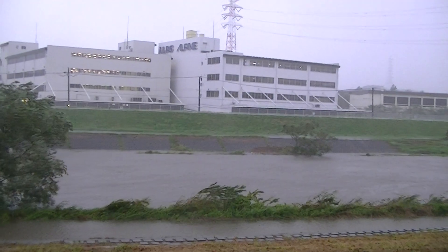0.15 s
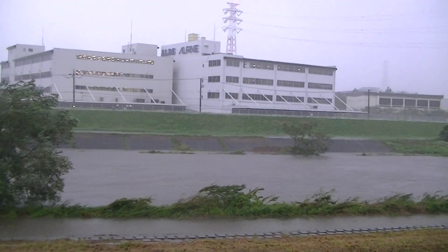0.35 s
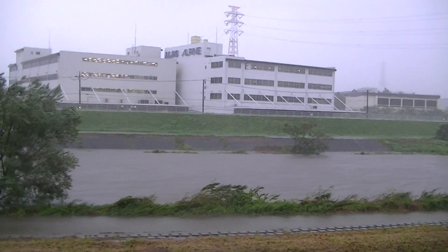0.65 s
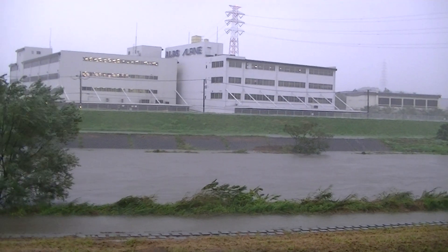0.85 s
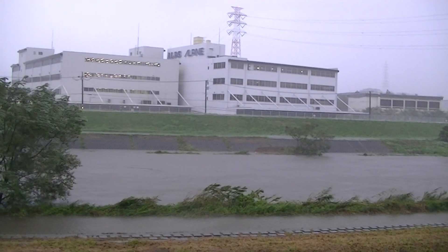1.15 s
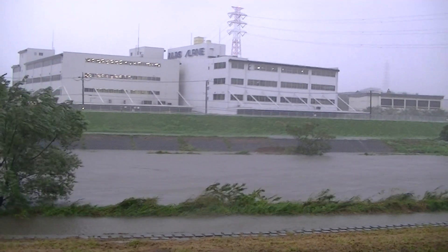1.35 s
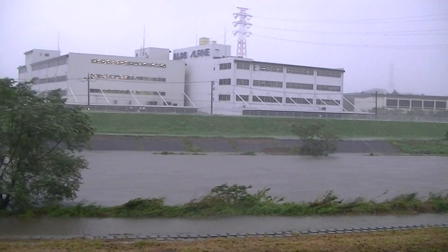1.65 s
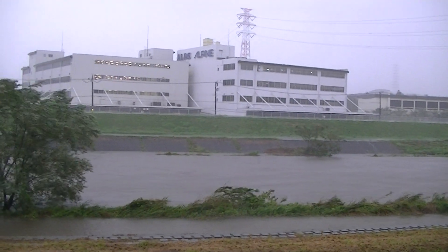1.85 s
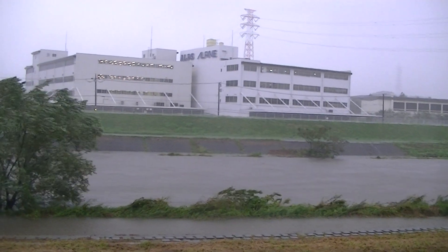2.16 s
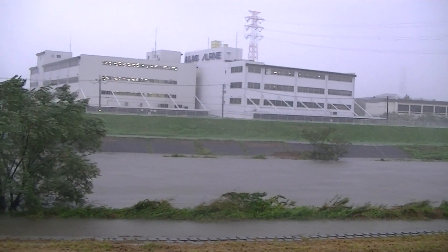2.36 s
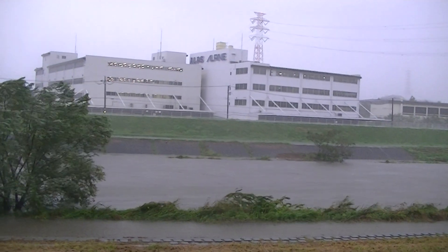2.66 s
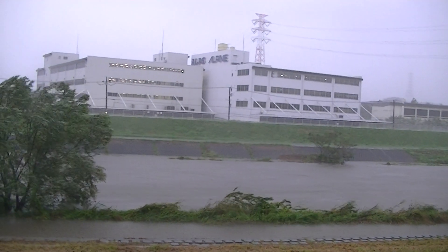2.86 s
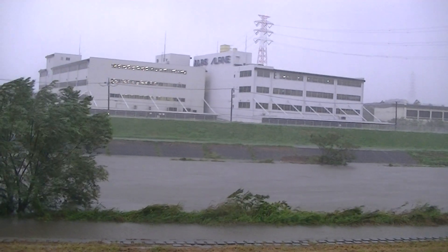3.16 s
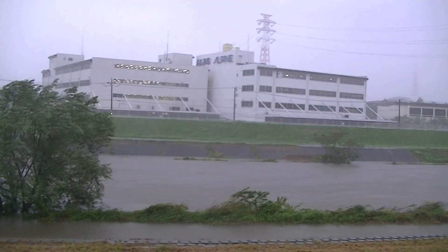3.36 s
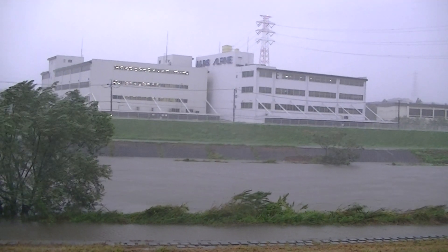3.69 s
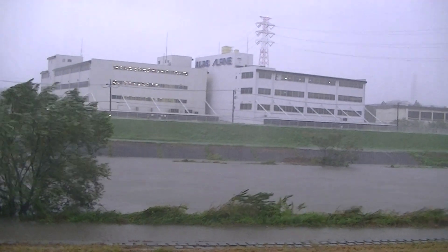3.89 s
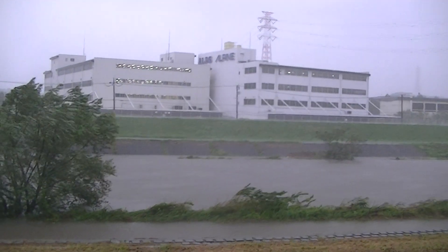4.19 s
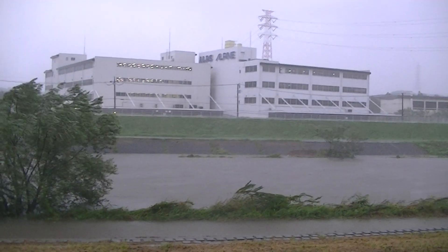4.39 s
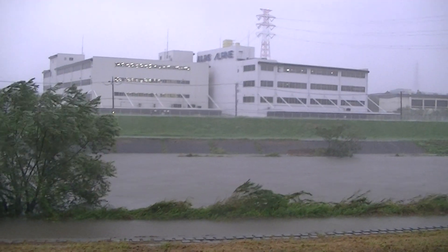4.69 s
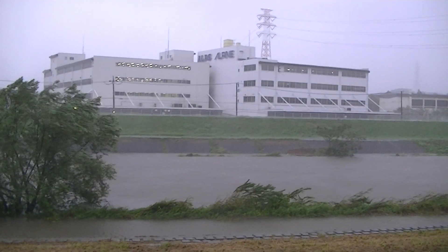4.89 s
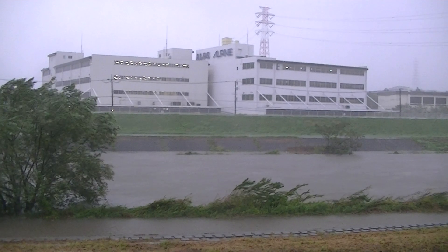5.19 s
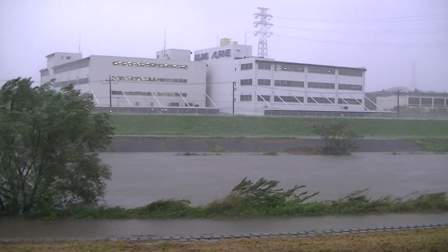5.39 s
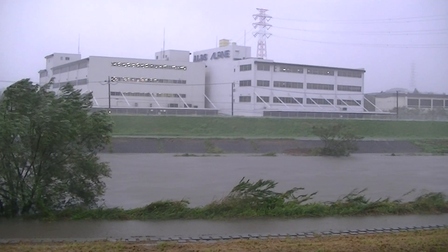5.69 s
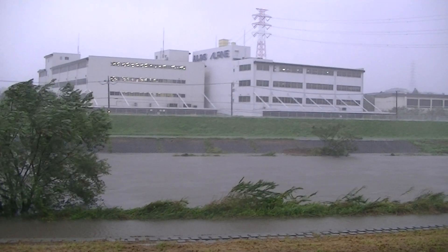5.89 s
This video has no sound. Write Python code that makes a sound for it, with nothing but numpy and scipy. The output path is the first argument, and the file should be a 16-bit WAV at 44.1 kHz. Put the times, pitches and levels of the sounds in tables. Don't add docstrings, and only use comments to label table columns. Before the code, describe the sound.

Steady heavy rain with a mid-pitched, panel-drumming rush fills the whole stretch. It begins fairly even, leaps up in overlapping gusts after two and a half seconds, and gradually settles. Bright tiny glass ticks cluster in the last third, with a couple of water slaps and brief air thumps on the right. Soft dull wiper knocks sit almost buried. The microphone is close to the car, with mostly central sound and little deep bass.

```python
import sys
import numpy as np
from scipy import signal
from scipy.fft import rfft, irfft, next_fast_len
from scipy.io import wavfile

SR = 44100
rng = np.random.default_rng(int(sys.argv[2]) if len(sys.argv) > 2 else 0)


def rack_gain(trim_db):
    fader = np.asarray(trim_db, float)
    return 10 ** (fader / 20)


def generate_wav(signal):
    frames = np.transpose(np.atleast_2d(signal))
    scaled = np.clip(frames, -1, 1) * 32767
    pcm = np.round(scaled).astype(np.int16)
    wavfile.write(sys.argv[1], SR, pcm)


N = 266364


def drift(rate):
    coarse = 40
    r = np.exp(-2 * np.pi * rate * coarse / SR)
    noise = rng.standard_normal(N // coarse + 2002)
    slow = signal.lfilter([1], [1, -2 * r, r * r], noise)[2000:]
    return np.interp(np.arange(N) / coarse, np.arange(len(slow)), slow / slow.std())


def at_hz(points, hz):
    table_hz, values = np.transpose(points)
    return np.interp(np.log(hz), np.log(table_hz), values)


def in_time(rows):
    s, *columns = np.transpose(rows)
    return [np.interp(np.arange(N) / SR, s, column) for column in columns]


def ring(clicks, hz, t60):
    r, w = rack_gain(-60 / (t60 * SR)), 2 * np.pi * hz / SR
    return signal.lfilter([0, np.sin(w)], [1, -2 * r * np.cos(w), r * r], clicks + 1e-18)


def add(out, s, piece):
    i = round(s * SR)
    out[..., i:i + piece.shape[-1]] += piece[..., :N - i]


def storm():
    # t/s, heavy drops on the panels level/dB, fine mist level/dB
    downpour = [(0.0, -36.1, -50.5), (0.3, -37.0, -49), (0.9, -36, -47), (1.5, -35.0, -49),
                (2.45, -34.5, -50), (3.0, -31.5, -52), (4.2, -33, -49), (4.7, -34.5, -48.5),
                (5.45, -35.9, -48.5), (6.04, -35, -49)]
    # crest t/s, strength/dB, fading time/s, fineness of the water/dB
    gust_table = [(0.515, -41.5, 0.157, -5), (0.805, -39.5, 0.03, -8), (1.054, -38.5, 0.18, -5),
                  (1.729, -36.5, 0.067, 0), (1.858, -34.5, 0.054, -0.4), (2.215, -39.5, 0.12, 2),
                  (2.601, -28, 0.07, 2.5), (2.718, -24, 0.064, 4), (2.828, -26.5, 0.039, 3.0),
                  (2.91, -31.5, 0.046, 3.2), (3.087, -25.5, 0.081, 0.7), (3.413, -29, 0.16, 2.5),
                  (3.464, -32, 0.036, 4), (3.57, -26, 0.105, 2.5), (3.914, -30, 0.19, 1.8),
                  (3.967, -34, 0.026, -4.3), (4.076, -36, 0.099, 4), (4.303, -29, 0.065, 1),
                  (4.437, -31.5, 0.073, 3.5), (4.81, -35, 0.019, 0), (4.875, -32.5, 0.039, 1.5),
                  (5.081, -34.5, 0.13, -1.5), (5.71, -37.5, 0.12, -3.5)]
    # level/dB, share of fineness
    gust_feeds = [
        (-32.5, -1.01),
        (0, -0.71),
        (-7.5, 0.6),
        (-30.5, 3),
    ]
    drops_db, mist_db = in_time(downpour)
    boom = rack_gain(drops_db - 26.5) ** 2
    drumming = rack_gain(drops_db) ** 2
    splash = rack_gain(drops_db - 8.5) ** 2 + rack_gain(mist_db + 3.5) ** 2
    spray = rack_gain(mist_db) ** 2
    lags_s = (0.02, 0.02, 0, 0)
    rise_share = 0.74
    crest, strength_db, fading, fine_db = np.transpose(gust_table)
    t, out = np.arange(0, N + 100, 100) / SR, []
    for fall, (feed_db, share), lag in zip((boom, drumming, splash, spray), gust_feeds, lags_s):
        late = (t[:, None] - crest - lag) / fading
        late = np.where(late < 0, late / rise_share, late)
        flung = np.exp(-late ** 2) @ rack_gain(strength_db + feed_db + share * fine_db) ** 2
        out.append(10 * np.log10(fall + np.interp(np.arange(N) / SR, t, flung)))
    return np.array(out)


def slaps():
    # t/s, jump/dB
    slap_table = [(.14, 1.5), (1.07, 1), (2.59, 2), (2.70, 0.5), (2.73, 1.5), (3.475, 2), (3.575, 1.5),
                  (4.065, -0.5), (4.218, 4), (4.262, 3), (4.805, 5.5), (4.87, 2.5), (5.055, 3)]
    out, t = np.zeros(N), np.arange(SR // 4) / SR
    for s, jump_db in slap_table:
        add(out, s, jump_db * np.exp(-t / 0.016) * (1 - np.exp(-t / 0.0027)))
    return out


def impacts(per_s, size_db):
    sizes = rack_gain(size_db * np.minimum(rng.exponential(1, N), 5)) * rng.choice([-1, 1], N)
    hits = sizes * (rng.random(N) < per_s / SR)
    return hits / hits.std()


def rain(near_share, spread, sheet_db, patch_db):
    storm_hz = [
        180,
        900,
        4200,
        11000,
    ]
    # f/Hz, level/dB per Hz
    rain_colour = [(35, -81), (60, -58), (85, -48), (183, -28.5), (237, -20.5), (433, -5), (892, 0.5),
                   (1050, -1.5), (1450, -1), (4140, -10), (11800, -25), (13900, -33), (15600, -39)]
    # f/Hz, side minus mid level/dB
    side_width = [(60, 0), (110, -6), (200, -10.5), (380, -14.5), (700, -17.5), (1290, -21), (2380, -16.5),
                  (4400, -17), (8120, -17.5), (15000, -20)]
    # f/Hz, left minus right level/dB
    left_lean = [(60, -1.0), (110, -1), (200, -2.5), (380, -1.0), (700, -0.5), (1290, -0.5), (2380, -0.5),
                 (4400, -0.5), (8120, -0.5), (15000, 1.5)]
    size = next_fast_len(N)
    hz = np.maximum(np.arange(size // 2 + 1) * SR / size, 1)
    near = np.clip(near_share * (hz / 8000) ** 0.45, 0, 1)
    far, across = rfft(rng.standard_normal((2, N)), size)
    drops = rfft(impacts(1500.0, size_db=4.5), size)
    mid = np.sqrt(1 - near) * far + np.sqrt(near) * drops

    colour = rack_gain(at_hz(rain_colour, hz))
    middle = (hz > 500) & (hz < 2000)
    colour = colour / np.sqrt(2 * np.sum(colour[middle] ** 2) / size)
    pair = colour * np.array([mid, across * rack_gain(at_hz(side_width, hz))])

    layers = storm()
    layers[1:] += slaps()
    mean_db = layers[1].mean()
    swells = layers - layers.mean(axis=1, keepdims=True)

    centres = 120 * 2 ** np.arange(0, 7.1, .5)
    place = np.interp(np.log(hz), np.log(centres), np.arange(len(centres)))
    sheets, neighbour, out = drift(33), drift(8), 0
    for k, centre in enumerate(centres):
        band = np.maximum(1 - abs(place - k), 0)
        mid_band, side_band = irfft(pair * band, size)[:, :N]
        shares = [np.interp(np.log(centre), np.log(storm_hz), row) for row in np.eye(4)]
        own = drift(11.5)
        flicker_db = sheet_db * sheets + patch_db * (own + neighbour)
        gain = rack_gain(mean_db + shares @ swells + flicker_db)
        side_band = side_band * rack_gain(spread * (shares[2] + shares[3]) * swells[2])
        lean = at_hz(left_lean, centre) / 2
        left = (mid_band + side_band) * rack_gain(lean)
        right = (mid_band - side_band) * rack_gain(-lean)
        out = out + gain * np.array([left, right])
        neighbour = own
    return out


def strays(level_db, size_db, cycles):
    # t/s, rate/drops per s
    stray_rate = [
        (0, 12),
        (2.5, 15),
        (4.1, 37),
        (4.4, 98),
        (5.0, 59),
        (6.04, 70),
    ]
    sizes = rack_gain(level_db + size_db * np.minimum(rng.exponential(1, N), 2))
    born = rng.random(N) < in_time(stray_rate)[0] * rack_gain(5 * drift(12)) / SR
    pitches, dealt = np.geomspace(6000, 14000, 8), rng.integers(0, 8, N)
    rings = sum(ring(sizes * born * (dealt == k), hz, cycles / hz) for k, hz in enumerate(pitches))
    return signal.sosfilt(signal.butter(2, 4000, "high", fs=SR, output="sos"), rings)


def glass(cycles):
    # t/s, peak level/dB, f/Hz
    tick_table = [(.034, -35, 11500), (1.150, -28, 9000), (1.756, -34, 8500), (1.886, -31, 10500),
                  (2.389, -43, 8500), (2.601, -31, 11500), (4.283, -35, 12000), (4.300, -24, 12000),
                  (4.4025, -28, 12500), (4.4052, -24, 10500), (4.4054, -20, 14000), (4.421, -30, 11500),
                  (4.4706, -27, 11500), (4.481, -28, 13000), (4.512, -31, 12500), (4.590, -21, 8000),
                  (4.593, -27, 10500), (4.687, -22, 8800), (4.769, -30, 8500), (4.773, -36, 12500),
                  (5.125, -34, 12000), (5.1695, -32, 12000), (5.239, -21, 9350), (5.4465, -25, 14000),
                  (5.542, -24, 7500), (5.561, -30, 9000), (5.6587, -30, 12000), (5.7286, -24, 7000),
                  (5.781, -26, 12500), (6.031, -29, 12000)]
    out, click = np.zeros(N), np.diff(signal.unit_impulse(300, 1))
    for s, peak_db, hz in tick_table:
        tick = ring(click, hz, cycles / hz)
        add(out, s, rack_gain(peak_db) * tick / abs(tick).max())
    return out


def wipers():
    # t/s, knock level/dB
    wiper_turns = [
        (.400, -34),
        (1.195, -35),
        (1.876, -41),
        (2.596, -42),
        (3.196, -34),
        (3.989, -37),
        (4.646, -44),
        (5.385, -33),
    ]
    # f/Hz, level/dB, t60/s, delay/s
    knock_modes = [
        (420, 0, .05, 0),
        (280, -10, .04, 0),
        (660, -3, .03, 0),
    ]
    # f/Hz, level/dB, t60/s, delay/s
    thud_modes = [
        (189, 0, 0.098, .006),
        (142, -2, 0.098, 0.0333),
    ]
    thud_levels = [
        -63,
        -48,
    ]
    out, click = np.zeros(N), signal.unit_impulse(SR // 4)
    for turn, (s, knock_db) in enumerate(wiper_turns):
        for modes, blow_db in ((knock_modes, knock_db), (thud_modes, thud_levels[turn % 2])):
            for hz, db, t60, delay in modes:
                swell = ring(ring(click, hz, t60), hz, t60)
                add(out, s + delay, rack_gain(blow_db + db) * swell / abs(swell).max())
    return out * rack_gain([[-1.2], [1.2]])


def puffs():
    # t/s, peak level/dB, f/Hz, length/s, share reaching the left port out of step/0-1
    puff_table = [(0.521, -43.5, 263, .04, .8), (.58, -53, 150, .08, .7), (1.545, -33, 380, 0.0047, .5),
                  (1.548, -43, 170, 0.015, .2), (3.025, -46, 257, 0.014, .4), (3.036, -46, 173, 0.026, .5),
                  (4.23, -38, 298, .014, 0.4), (4.240, -41, 186, 0.013, 0.3),
                  (4.773, -22, 327, 0.0044, 0.5), (4.776, -35, 221, 0.026, 0.7),
                  (4.781, -27, 485, 0.0069, .4), (4.815, -42, 330, 0.014, 0.5), (4.908, -43, 450, .01, .5),
                  (5.015, -17.5, 950, 0.0013, 0.1), (5.097, -41.5, 168, 0.013, .4),
                  (4.776, -40, 120, .02, .7), (5.10, -38.5, 125, .025, .8)]
    out = np.zeros((2, N))
    for s, peak_db, hz, length, share in puff_table:
        t = np.arange(-2 * length, 2 * length, 1 / SR)
        wobble = rng.normal(0, .5) * (t / length) ** 2
        turn = 2 * np.pi * hz * t + wobble + 2
        swell = rack_gain(peak_db) * np.exp(-(2 * t / length) ** 2)
        add(out, s - 2 * length, swell * [share * np.sin(turn - 2.0), np.sin(turn)])
    return out


def capsule(x):
    return signal.sosfilt(signal.butter(4, [188, 13200], "band", fs=SR, output="sos"), x)


def scene():
    drops = strays(level_db=-41.5, size_db=4.5, cycles=40.0) + rack_gain(-2.5) * glass(cycles=27.0)
    close = drops + wipers() + puffs()
    return rain(near_share=0.079, spread=0.21, sheet_db=0.57, patch_db=0.29) + capsule(close)


def band_limit(x):
    return signal.sosfilt(signal.butter(12, 15740, fs=SR, output="sos"), x)


def record(dry):
    low_band = signal.butter(2, [15, 110], "band", fs=SR, output="sos")
    own = signal.sosfilt(low_band, rng.standard_normal((2, N)))
    return band_limit(dry + rack_gain(-91) * own / own.std())


dry = scene()
out = record(dry)
generate_wav(out)
```